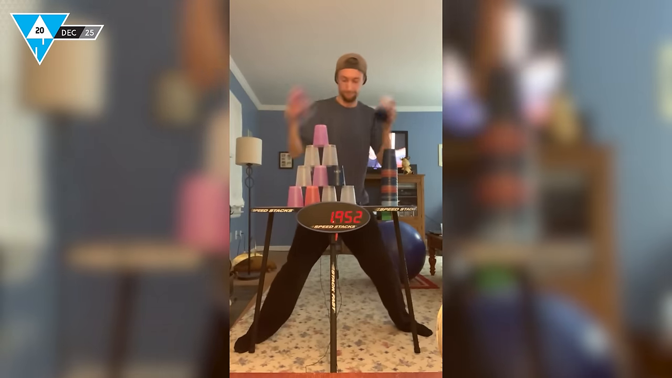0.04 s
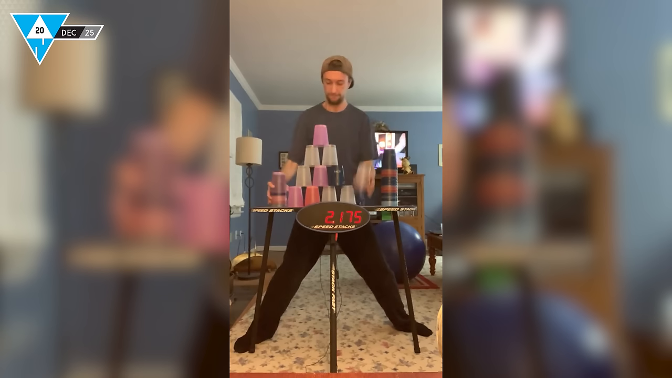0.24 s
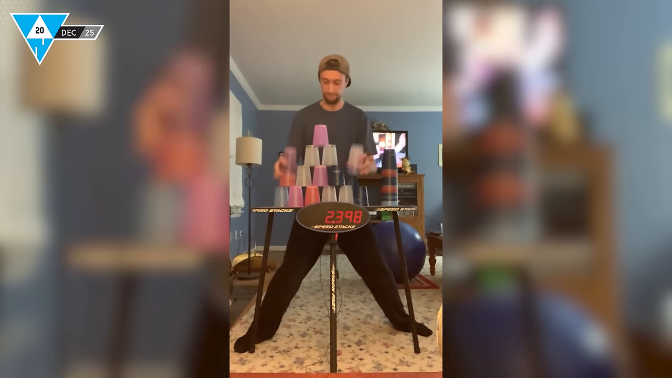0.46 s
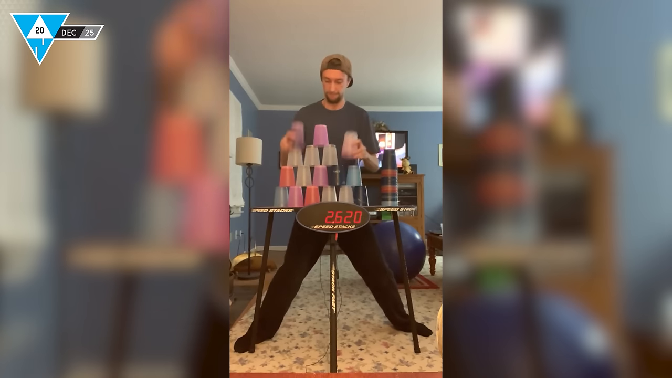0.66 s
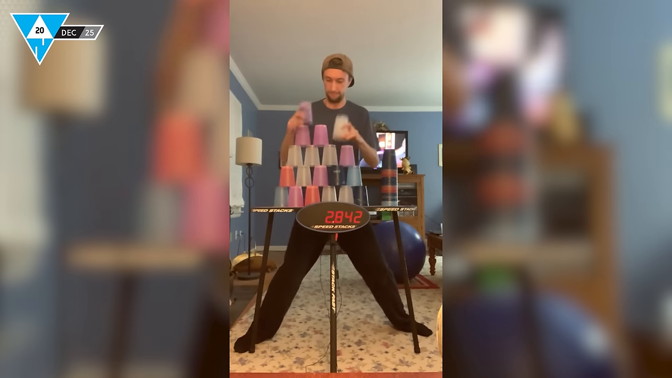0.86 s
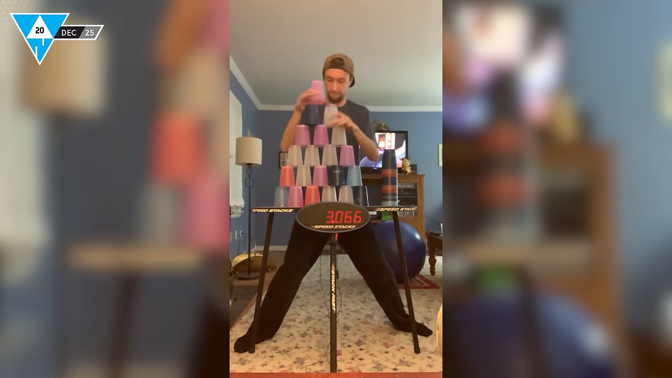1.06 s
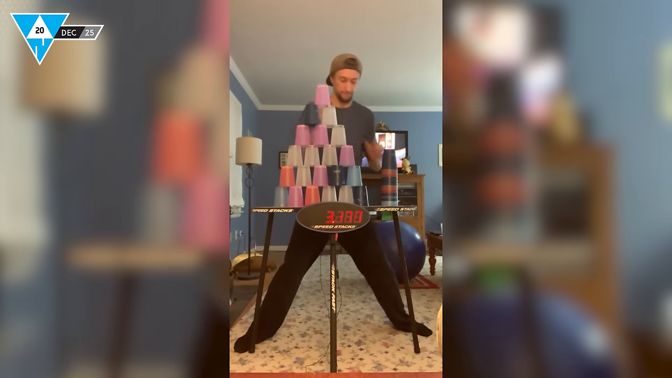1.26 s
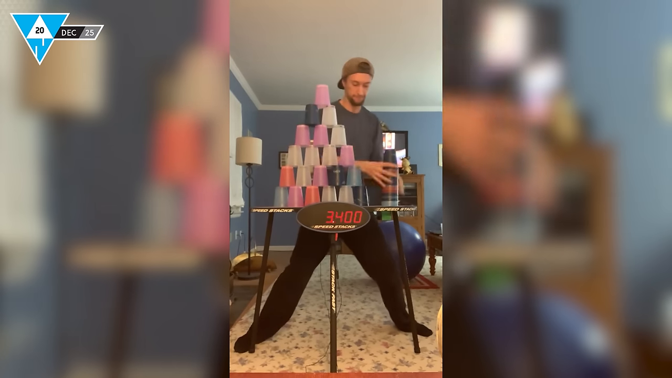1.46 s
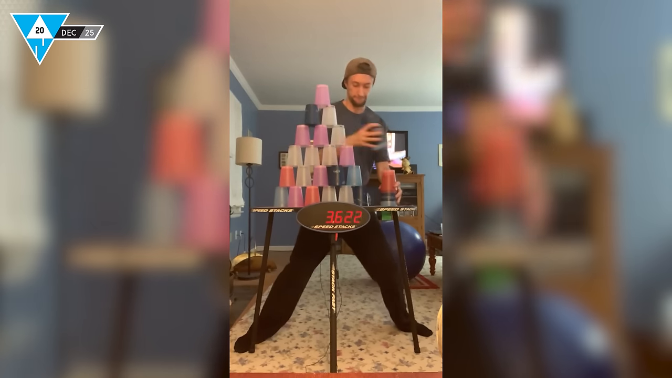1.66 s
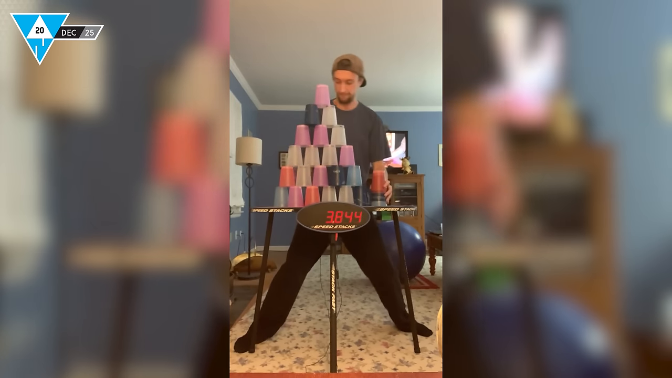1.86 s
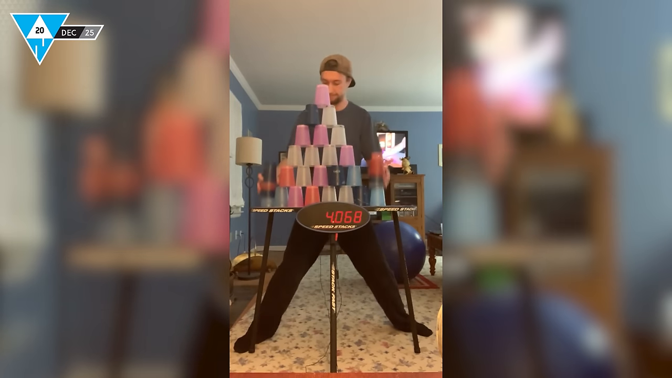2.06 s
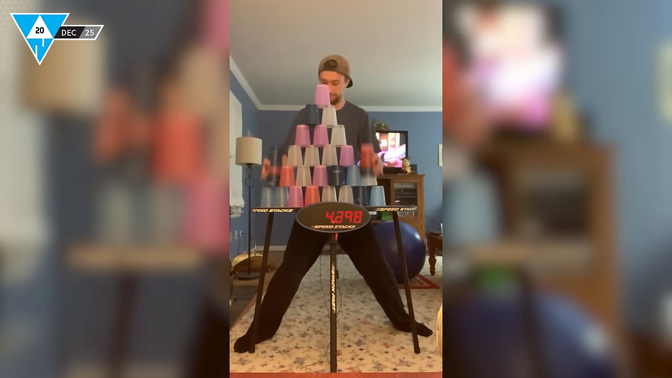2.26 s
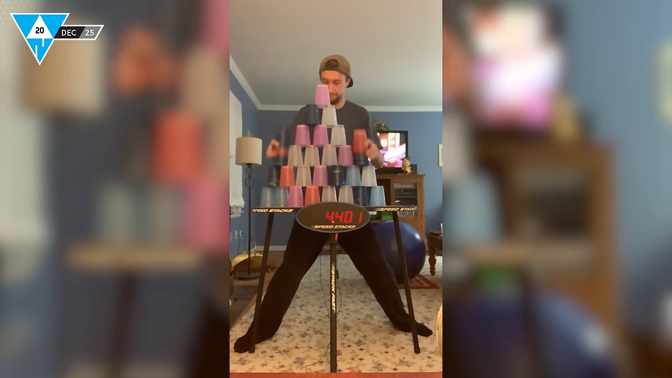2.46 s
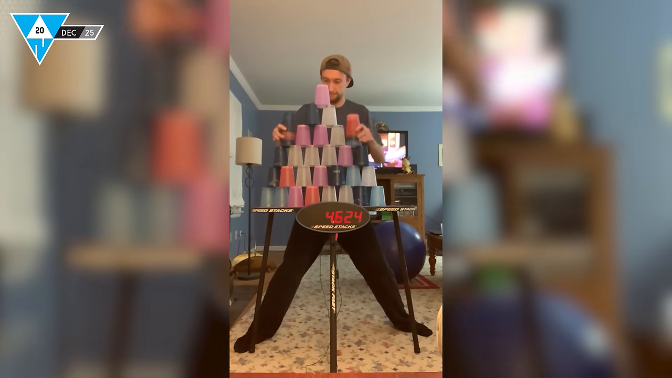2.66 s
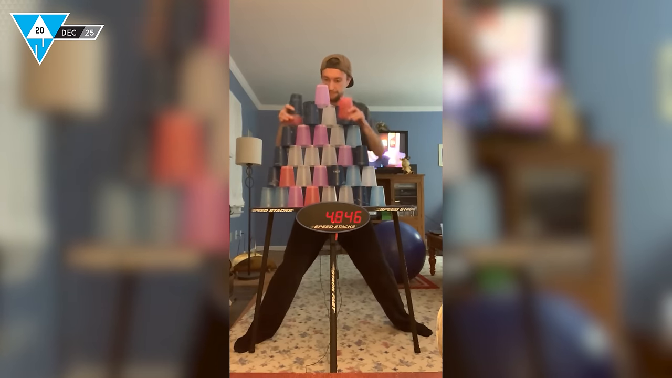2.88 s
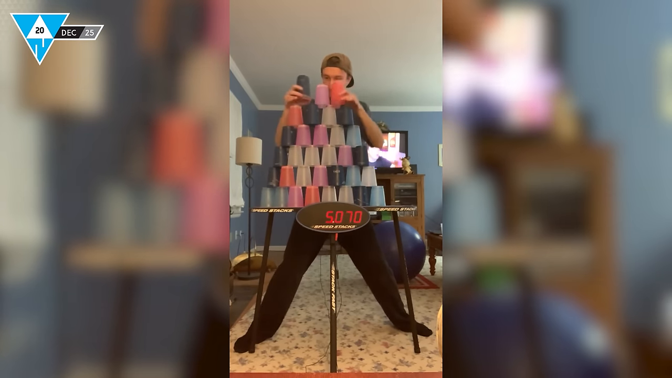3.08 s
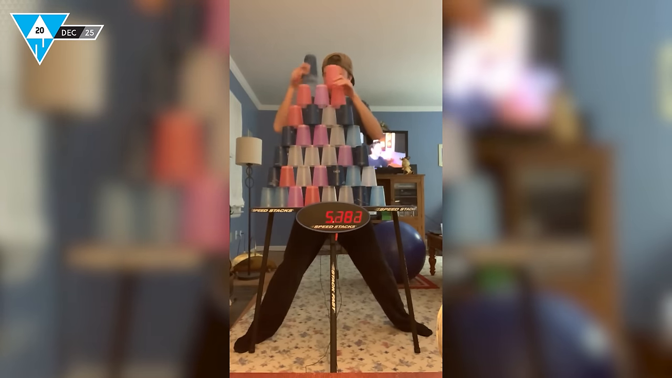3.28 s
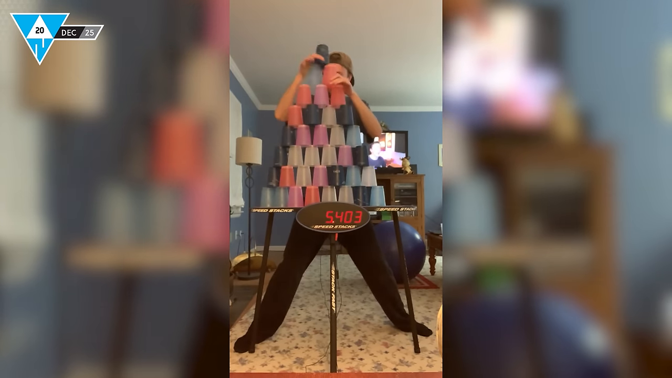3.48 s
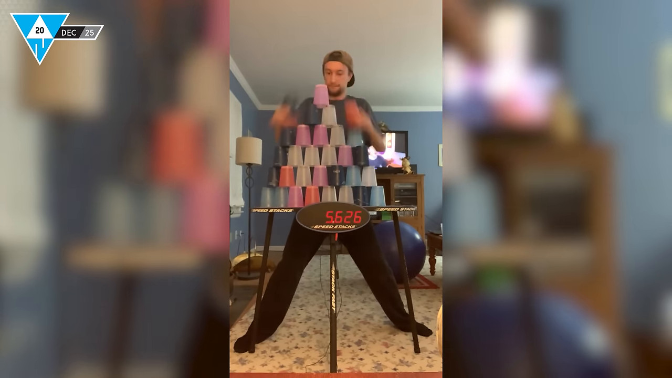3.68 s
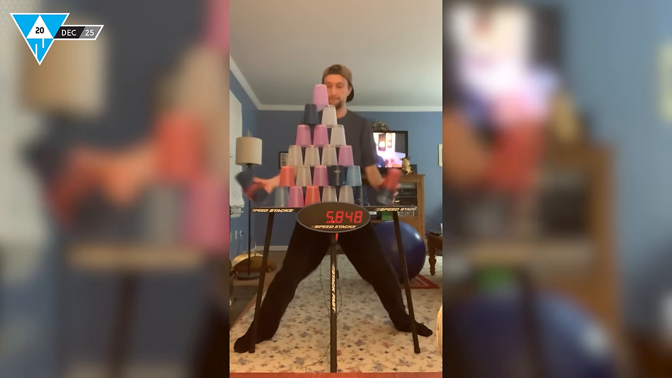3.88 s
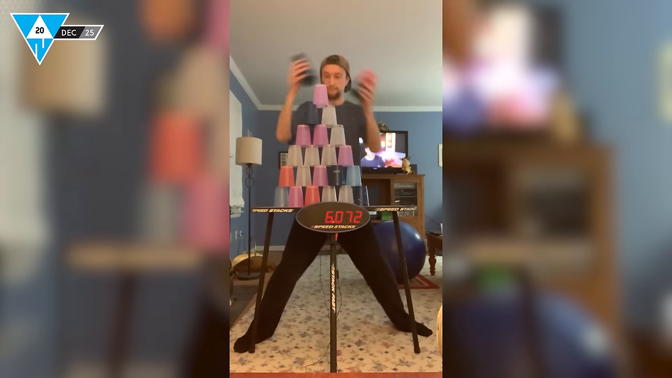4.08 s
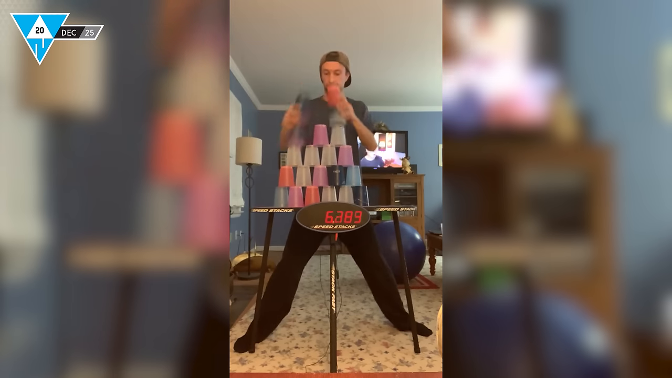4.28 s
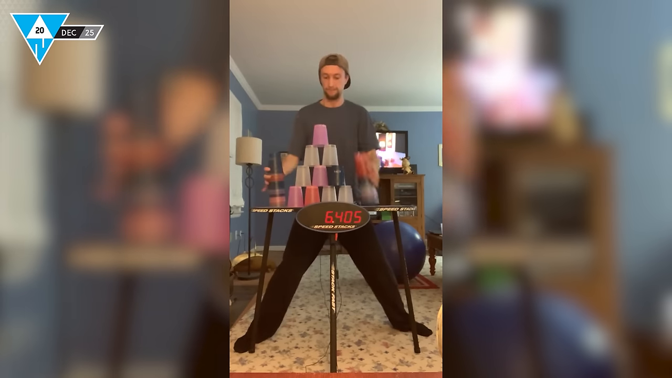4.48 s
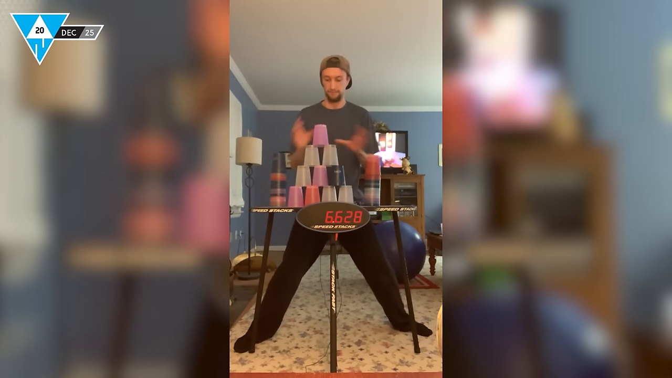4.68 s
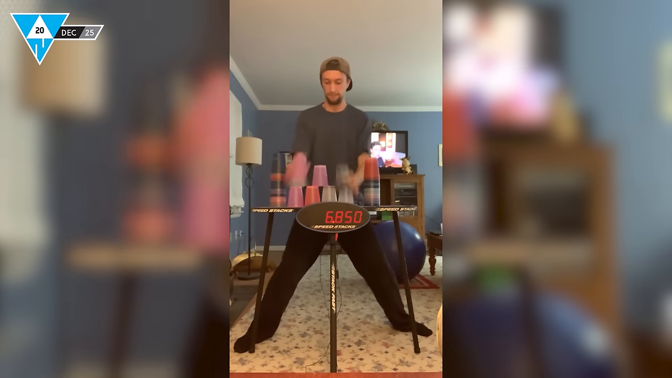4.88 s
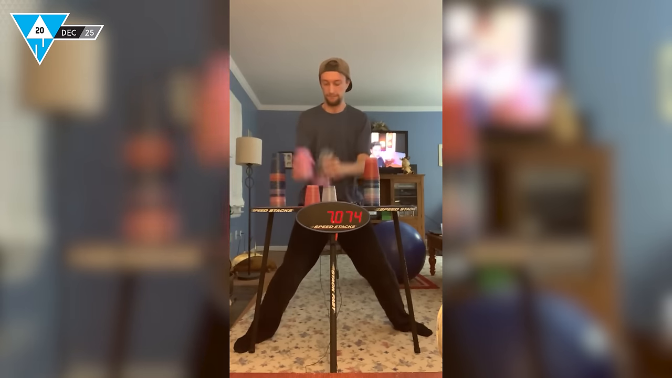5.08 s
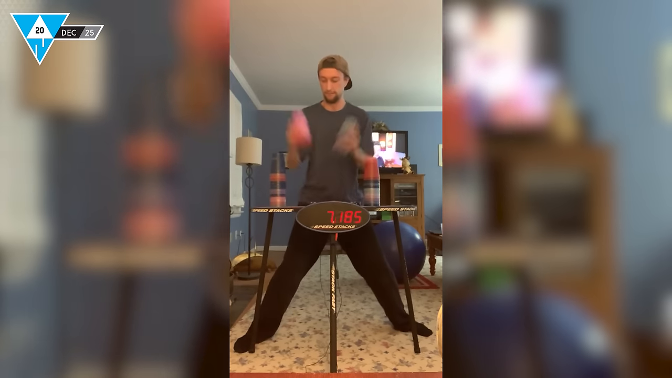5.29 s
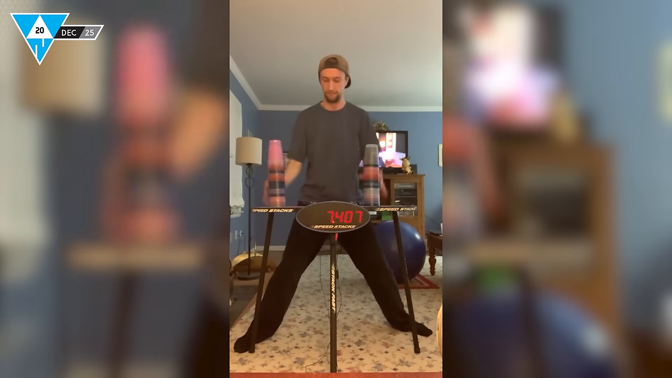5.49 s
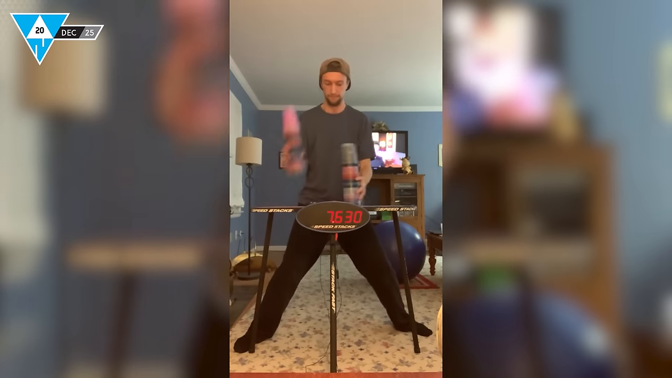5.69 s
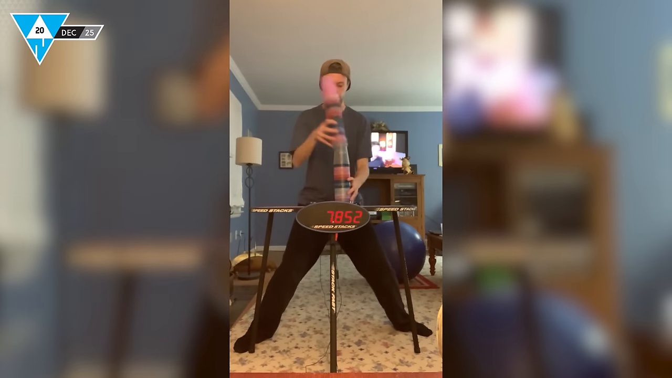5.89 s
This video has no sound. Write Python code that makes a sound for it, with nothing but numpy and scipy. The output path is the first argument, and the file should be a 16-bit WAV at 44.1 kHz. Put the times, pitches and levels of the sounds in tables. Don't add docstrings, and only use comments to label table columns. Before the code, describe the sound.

In a small living room, light hollow plastic cups are set down one by one in a very fast run, pause briefly, then a second fast run follows. After that the cups slam and slide together in dense clattering, scraping bursts with dull table thumps, and end on a few soft taps. A phone listens in stereo from across the room, with short room reverberation and faint air noise.

```python
import sys
import numpy as np
from scipy import signal
from scipy.fft import rfft, irfft, next_fast_len
from scipy.io import wavfile
from scipy.ndimage import uniform_filter1d

SR = 44100
rng = np.random.default_rng(int(sys.argv[2]) if len(sys.argv) > 2 else 0)


def attenuation_scalar(level_db):
    decades = np.asarray(level_db, float) / 20
    return 10 ** decades


def store_pcm(level_fs):
    pcm = np.round(np.clip(level_fs, -1, 1) * 32767).astype(np.int16)
    wavfile.write(sys.argv[1], SR, np.atleast_2d(pcm).T)


N = 261954
LEAD = 500
SHELL = signal.butter(3, 430, "high", fs=SR, output="sos")

# (frequency [Hz], level [dB], t60 [s])
WALL_MODES = [(520, 2, 0.011), (540, 1.5, 0.008), (620, -6, 0.0035), (793, 0.5, 0.061), (917, -5, 0.16),
              (1190, -6, 0.018), (1270, -11, 0.085), (1350, 1, 0.016), (1694, -10, 0.075),
              (2000, -10, 0.0082), (2790, -31, 0.06), (3350, -22.5, 0.056), (4277, -18, 0.06)]
# (frequency [Hz], density [dB per Hz])
RIM_NOISE = [(820, -13.5), (1400, -10.5), (1510, 1), (3350, -6), (3720, -10.5), (4440, -9), (4980, -15),
             (7390, -12.5), (9390, -10), (11600, -19), (14400, -14), (16100, -23), (16800, -99.5)]
# (time [s], thump [dB], sway [dB])
TABLE_BANGS = [(2.098, -49, -60), (3.719, -54, -57.5), (3.838, -33, -44.5), (4.259, -33, -39),
               (4.333, -27, -39), (4.472, -34, -38), (4.538, -36.5, -61), (4.982, -38, -46.5),
               (5.108, -31, -52.5), (5.189, -30, -44), (5.474, -28.5, -37), (5.917, -58.5, -50.5)]


def evened(x):
    return x / np.sqrt(np.mean(x ** 2) + 1e-20)


def peaked(x):
    return x / np.sqrt(uniform_filter1d(x ** 2, 220).max())


def read(points, hz):
    f, value = np.transpose(points)
    return np.interp(np.log(hz + 1), np.log(f + 1), value)


def coloured(x, points):
    length = x.shape[-1]
    size = next_fast_len(length, True)
    gain = attenuation_scalar(read(points, np.fft.rfftfreq(size, 1 / SR)))
    return irfft(rfft(x, size) * gain, size)[..., :length]


def add(mix, s, sound):
    part = mix[round(s * SR):][:len(sound)]
    part += sound[:len(part)]


def ring(modes, size, detune, luck_db):
    hz, db, t60 = np.transpose(modes)[:, :, None]
    off, sign, luck = rng.standard_normal((3, len(modes), 1))
    t = np.arange(size) / SR
    level = np.sign(sign) * attenuation_scalar(db + luck_db * luck - 60 * t / t60)
    return (level * np.sin(2 * np.pi * hz * (1 + detune * off) * t)).sum(0)


def knocks():
    # (time [s], blow [dB], cup air
    # [Hz], rim [Hz])
    set_down = [(0.287, -15.5, 600, 1940), (0.478, -17.5, 713, 1820), (0.484, -18.5, 630, 4100),
                (0.552, -31, 650, 1925), (0.578, -6, 757, 1870), (0.649, -17.5, 1260, 1905),
                (0.69, -32, 560, 2214), (0.716, -26.5, 650, 2830), (0.772, -7.5, 807, 1900),
                (0.863, -21, 880, 3370), (0.903, -24, 643, 2100), (0.936, -31.5, 554, 3600),
                (0.969, -9.5, 914, 3650), (1.02, -14, 1240, 2070), (1.123, -17, 1270, 2720),
                (1.13, -20, 1250, 2940), (1.161, -12, 1260, 5600), (1.165, -9.5, 810, 6370),
                (2.1, -33, 563, 1750), (2.122, -30, 700, 4480), (2.29, -16, 640, 1770),
                   (2.303, -14.5, 560, 4040), (2.339, -19.5, 730, 2000), (2.405, -32, 666, 2000),
                   (2.499, -6.5, 580, 2600), (2.545, -20.5, 620, 3600), (2.62, -37, 556, 3430),
                   (2.705, -15, 1188, 4200), (2.722, -13, 820, 1950), (2.906, -14, 1253, 1930),
                   (2.954, -12, 1350, 2790), (3.11, -12, 890, 2000), (3.143, -28, 710, 1960),
                   (3.172, -13.5, 872, 6200), (3.307, -19.5, 950, 1850), (3.377, -18.5, 936, 1950),
                   (3.409, -19, 876, 2010), (3.441, -25.5, 609, 2020), (3.517, -8.5, 1239, 1930),
                   (3.543, -15, 1270, 2120)]
    # (time [s], blow [dB], cup air [Hz], rim [Hz], crack over the blow [dB])
    rim_first = [
        (0.293, -22.5, 1400, 3050, -3.5),
        (0.309, -23.5, 2616, 2900, -8.5),
        (0.323, -30, 1400, 2800, -0.5),
        (2.098, -27, 594, 2800, -13.5),
        (2.311, -26, 1366, 4300, -4.5),
        (3.673, -18.5, 980, 6720, 6),
        (3.845, -29, 718, 3410, 5.5),
    ]
    # (time [s], blow [dB], cup
    # air [Hz], rim [Hz], crack over the blow [dB])
    row_slams = [(3.632, -30.5, 920, 6000, -15), (3.682, -8.5, 988, 3350, -12.5),
                 (3.705, -16, 1322, 3370, 5), (3.735, -15.5, 1000, 5600, 0), (3.762, -18, 854, 1910, 4.5),
                 (3.817, -16.5, 903, 2400, 2.5), (3.691, -6, 904, 3350, -9.5), (3.722, -16, 1190, 2360, 4),
                 (3.743, -13, 1253, 1900, -14.5), (3.788, -6, 1265, 2060, -11),
                 (3.795, -13, 950, 4400, -0.5), (3.801, -22.5, 514, 5500, 9.5),
                 (3.824, -6, 618, 1970, -6.5), (3.867, -18.5, 565, 2400, 2.5),
                 (4.249, -10.5, 908, 6300, -14), (4.297, -15, 1270, 3350, 1.5),
                 (4.304, -22, 1440, 6300, -1), (4.33, -6.5, 1274, 2880, -9), (4.348, -25, 598, 2900, -8.5),
                 (4.366, -15, 812, 3170, -8), (4.382, -13.5, 1294, 2700, -5),
                 (4.404, -21.5, 625, 2500, -12.5), (4.426, -19.5, 1500, 4300, 3.5),
                 (4.419, -15.5, 632, 4160, -3), (4.44, -18.5, 802, 2050, 1.5), (4.467, -15, 1180, 2100, -1),
                 (4.471, -7, 485, 3150, -6.5), (4.497, -22, 492, 2500, -10), (4.533, -21, 1130, 1700, 2),
                 (4.54, -17, 534, 2530, 4),
                 (4.786, -38, 485, 2870, 4.5), (4.829, -34.5, 1290, 6500, -28.5),
                  (4.861, -25, 1245, 3270, -3.5), (4.845, -19.5, 1292, 3500, -29.5),
                  (4.886, -7, 1280, 4070, -13), (4.911, -7, 974, 1720, -1), (4.918, -17, 1270, 2670, 6.5),
                  (4.99, -25, 683, 2350, 6.5), (4.958, -13, 544, 1870, -6.5),
                  (4.984, -22.5, 930, 2320, 3.5), (5.087, -36.5, 970, 4170, -3),
                  (5.108, -11, 785, 2230, -4.5), (5.142, -5.5, 861, 1720, -6), (5.148, -20, 780, 4500, 1.5),
                  (5.157, -2.5, 520, 3220, -21), (5.196, -17, 560, 4600, -4), (5.189, -11, 588, 2480, 1),
                  (5.327, -34.5, 570, 1860, -12), (5.442, -39.5, 730, 2640, 4),
                  (5.467, -10.5, 1203, 3450, -4.5), (5.473, -8, 1270, 2600, -1.5)]
    # (time [s], blow [dB], cup air [Hz], rim [Hz])
    nudges = [
        (1.517, -48, 456, 2570),
        (1.562, -46, 1036, 1840),
        (1.666, -42, 1420, 2500),
        (1.747, -57.5, 494, 3030),
        (1.987, -58, 1240, 2150),
        (4.122, -55, 509, 3460),
        (4.199, -40.5, 677, 6140),
        (4.731, -58, 487, 2070),
        (5.693, -45, 690, 2160),
        (5.916, -41, 1140, 3530),
    ]
    firm_crack_db, firm_db, graze = -13, -13, 0.1
    set_thump_db, slam_thump_db = -25, -30.5
    nudge_crack_db, nudge_thump_db = -9.5, -4.5
    placed = [(s, db, air, firm_crack_db + graze * (firm_db - db), set_thump_db, rim)
              for s, db, air, rim in set_down]
    slammed = [(s, db, air, crack_db, slam_thump_db, rim)
               for s, db, air, rim, crack_db in rim_first + row_slams]
    nudged = [(s, db, air, nudge_crack_db, nudge_thump_db, rim) for s, db, air, rim in nudges]
    return placed + slammed + nudged


def cup_body(contacts, air_hz):
    near_db = 5
    grip_t60, air_t60 = 0.02, 0.016
    wall = [(hz, db - near_db * abs(np.log2(hz / air_hz)), min(t60, grip_t60)) for hz, db, t60 in WALL_MODES]
    modes = wall + wall + [(air_hz, 7, air_t60)]
    body = signal.fftconvolve(ring(modes, size=1500, detune=0.02, luck_db=0.86), contacts)[:1500]
    return peaked(signal.sosfilt(SHELL, signal.sosfilt(SHELL, body)))


def rim_crack(contacts, rim_hz):
    # (frequency [Hz], level [dB])
    hiss_dull = [(3000, 6), (7000, -0.5), (9000, -22.5)]
    crack_t60 = 0.1
    t = np.arange(1500) / SR
    near_rim = [(rim_hz / 1.38, 0), (rim_hz, 6.), (rim_hz * 1.1, 0)]
    noise = coloured(coloured(rng.standard_normal(LEAD + 1500), RIM_NOISE), near_rim)
    snaps = signal.fftconvolve(contacts ** 2, np.exp(-t / 0.00098))[:1500]
    swell = attenuation_scalar(-60 * t / crack_t60) * (1 - np.exp(-t / .003))
    crack = peaked(noise[LEAD:] * (swell + 1.2 * snaps / snaps.max()))
    rim = signal.fftconvolve(ring([(rim_hz, 0, .007)] * 3, size=500, detune=.04, luck_db=0), contacts)
    add(crack, 0, 0.53 * peaked(rim))
    rise_db = -22 * t[LEAD:0:-1] / t[LEAD]
    return attenuation_scalar(rise_db) * coloured(evened(noise[:LEAD]), hiss_dull), crack


def chatter(air_hz):
    # (frequency [Hz], density [dB per Hz])
    shiver_noise = [(380, -31), (520, 6), (620, 8), (830, -3), (1050, -7.5), (1280, -3), (1600, -10.5),
                    (4000, -28.5), (7000, -32.5)]
    level_db, t60, near_db = -13.5, 0.24, 3
    t = np.arange(4000) / SR
    near_air = [(hz, db - near_db * abs(np.log2(hz / air_hz))) for hz, db in shiver_noise]
    shiver = evened(coloured(rng.standard_normal(4000), near_air))
    flutter_db = 3.7 * evened(uniform_filter1d(rng.standard_normal(4000), size=200))
    return attenuation_scalar(level_db - 60 * t / t60) * (1 - np.exp(-t / 0.0082)) * shiver * attenuation_scalar(flutter_db)


def thump():
    # (frequency [Hz], level [dB], t60 [s])
    top_modes = [(135, 3, 0.12), (166, 5, 0.16), (215.6, -4, 0.21), (280.6, 7, 0.1), (400, -5, 0.27),
                 (420.6, 7.5, 0.12)]
    swell = 1 - np.exp(-np.arange(4000) / SR / 0.011)
    return peaked(ring(top_modes + top_modes, size=4000, detune=0.0746, luck_db=0.5) * swell)


def knock(db, air_hz, crack_db, thump_db, rim_hz):
    t = np.arange(500) / SR
    landing = t / 0.0054 * np.exp(-t / 0.0028)
    contacts = rng.standard_normal(500) * (rng.random(500) < .04) * landing
    contacts[30] += .4
    hiss, crack = rim_crack(contacts, rim_hz)
    sound = np.r_[attenuation_scalar(crack_db - 11) * hiss, attenuation_scalar(thump_db - 2.5) * thump()]
    add(sound, LEAD / SR, cup_body(contacts, air_hz) + attenuation_scalar(crack_db - 2.0) * crack)
    add(sound, LEAD / SR, chatter(air_hz))
    return attenuation_scalar(db - 5.5) * sound


def slide(s, run_up, hold, db, bright_db):
    run_up_db, fade_db, fade_s = -24.5, -36.5, 0.046
    times = np.maximum.accumulate([max(s - run_up, 0), s, s + hold, s + hold + fade_s])
    return [(at, db + off_db, bright_db) for at, off_db in zip(times, (run_up_db, 0, 0, fade_db))]


def rattle(rows, under_db, per_s, spread_db, hiss):
    s, db, bright_db = np.transpose(rows)
    t = np.arange(s[0], s[-1], 1 / SR)
    strength = attenuation_scalar(spread_db * np.minimum(rng.exponential(1, len(t)), 4))
    contacts = strength * (rng.random(len(t)) < per_s / SR)
    which = rng.integers(0, 3, len(t))
    body = np.zeros(len(t))
    for k in range(3):
        wall = ring(WALL_MODES, size=1500, detune=0.056, luck_db=-1.0)
        body += signal.fftconvolve(contacts * (which == k), wall)[:len(t)]
    body = signal.sosfilt(SHELL, body)
    puffs = signal.fftconvolve(contacts, np.exp(-np.arange(600) / 24.0))[:len(t)]
    scrape = coloured((hiss + evened(puffs)) * rng.standard_normal(len(t)), RIM_NOISE)
    sound = evened(body) + attenuation_scalar(np.interp(t, s, bright_db)) * evened(scrape)
    return s[0], attenuation_scalar(np.interp(t, s, db) - under_db) * sound * signal.windows.tukey(len(t), .05)


def cups():
    # (time at full speed [s], run-up [s], hold [s], rattle [dB], scrape over the rattle [dB])
    sweeps = [
        (3.634, 0.033, 0.038, -27.5, 1),
        (3.676, .015, 0.13, -27.5, 3.5),
        (4.196, .008, 0.11, -44, -0.5),
        (4.249, .008, 0.25, -29, 4.5),
        (4.854, 0.072, 0.049, -30, -3.5),
        (4.901, 0.022, 0.093, -31.5, 7.5),
        (5.112, 0.0034, 0.027, -35, 7.5),
        (5.473, 0.02, 0.0035, -38, 0),
    ]
    # (time at full speed [s], run-up [s], hold [s], rustle [dB], brightness [dB])
    hands = [
        (.002, 0.003, 0.0041, -41, -7.5),
        (0.384, 0.049, 0.061, -53.5, 11.5),
        (1.524, 0.041, 0.1, -53, -4.5),
        (1.666, 0.026, 0.0044, -43, -30),
        (1.783, 0.034, 0.04, -75.5, 12),
        (1.915, .03, 0.0239, -62.5, -1),
        (2.379, 0.012, 0.27, -38.5, -9),
        (5.611, 0.026, 0.22, -58.5, 2.5),
        (5.92, 0.016, 0.017, -38, 0.5),
    ]
    mix = np.zeros(N)
    for s, *blow in knocks():
        add(mix, s - .001 - LEAD / SR, knock(*blow))
    for s, thump_db, _ in TABLE_BANGS:
        add(mix, s, attenuation_scalar(thump_db) * thump())
    for row in sweeps:
        add(mix, *rattle(slide(*row), under_db=6.5, per_s=500., spread_db=2.0, hiss=0.08))
    for row in hands:
        add(mix, *rattle(slide(*row), under_db=10.0, per_s=6300.0, spread_db=4.0, hiss=1.7))
    return signal.sosfilt(signal.butter(3, 110, "high", fs=SR, output="sos"), mix)


def table():
    rest_db, under_blow_db, rise_s, t60 = -73.5, -49, 0.0024, 0.66
    pushes = [(s, db + under_blow_db) for s, db, *_ in knocks()] + [(s, db) for s, _, db in TABLE_BANGS]
    push = np.zeros(N)
    for s, db in pushes:
        push[round(s * SR)] += attenuation_scalar(2 * db)
    t = np.arange(SR) / SR
    power = signal.fftconvolve(push, (1 - np.exp(-t / rise_s)) ** 2 * attenuation_scalar(-120 * t / t60))[:N]
    sway = [(15, -25.5), (30, -12.5), (52, -1.5), (75, -1), (110, -8.0), (200, -61.5)]  # (Hz, dB)
    lumps = coloured(rng.standard_normal(N), sway)
    return np.sqrt(abs(power) + attenuation_scalar(2 * rest_db)) * evened(lumps)


def hums():
    # (time [s], length [s], frequency [Hz], level [dB])
    tones = [
        (0.086, 0.12, 2110, -81),
        (1.293, 0.19, 374, -75),
        (1.828, 0.15, 2090, -77.5),
        (2.001, 0.28, 427, -68),
        (4.09, 0.11, 507, -64.5),
        (5.681, 0.31, 1290, -76),
        (5.682, 0.13, 2130, -72),
        (5.82, 0.12, 508, -65),
        (5.915, 0.019, 3490, -53.5),
    ]
    mix = np.zeros(N)
    for s, length, hz, db in tones:
        t = np.arange(0, length, 1 / SR)
        waver = np.cumsum(uniform_filter1d(rng.standard_normal(len(t)), 300)) * 0.039
        add(mix, s, attenuation_scalar(db + 8.0) * np.sin(2 * np.pi * hz * t + waver) * np.hanning(len(t)))
    return mix


def room(x):
    # (frequency [Hz], t60 [s])
    decay = [(100, 0.53), (260, 0.51), (700, 0.27), (1840, 0.32), (4850, 0.26), (12000, 0.21)]
    # (frequency [Hz], level [dB])
    late_dull = [(1500, -2.5), (4000, -3.5)]
    late_db, late_stretch = -24, 3.1
    taps = np.zeros(SR * 3 // 4)
    at = np.arange(260, len(taps) - 20, 20)
    taps[at + rng.integers(0, 20, len(at))] = rng.choice([-1., 1.], len(at))
    hz, t, z = signal.stft(taps, SR, nperseg=256)
    fall_db = -60 * t / read(decay, hz)[:, None]
    late = attenuation_scalar(late_db + read(late_dull, hz)[:, None] + fall_db / late_stretch)
    tail = signal.istft(z * (attenuation_scalar(fall_db) + late), SR, nperseg=256)[1]
    return signal.fftconvolve(x, tail / np.linalg.norm(tail))[:N]


def view():
    # (frequency [Hz], level [dB])
    stack = [(250, -2), (450, 0), (590, 0), (800, -4), (1000, 1.5), (1270, 3), (1550, -1.5), (2700, -2),
             (4300, 1.5), (9000, 1)]
    # (frequency [Hz], level [dB])
    air_noise = [(15, -25.5), (25, 1.5), (64, 1.5), (1500, -27), (2100, -11), (2690, -24), (6530, -29),
                 (9000, -34.5), (11700, -35), (12300, -70.5), (19800, -120)]
    room_db, air_db = -7, -72.5
    turns_per_s = 2.9
    dry = cups()
    sent = coloured(dry, stack)
    place = 2 * np.pi * turns_per_s * np.arange(N) / SR
    tails = room(sent * np.sin(place)) + room(sent * np.cos(place))
    air = attenuation_scalar(air_db) * evened(coloured(rng.standard_normal(N), air_noise))
    return dry + attenuation_scalar(room_db) * tails + hums() + table() + air


def scene():
    # (frequency [Hz], likeness [0..1])
    likeness = [(30, 1), (100, 0.71), (330, 0.86), (700, 0.34), (2000, 0.91), (5000, 0.14), (8000, 0.82),
                (10500, 0.86), (12200, 0.98), (16000, 0.92)]
    # (frequency [Hz], phase [rad])
    left_lead = [(430, 0), (700, -1.3), (1800, -1.7), (2740, -1.6), (5000, -1.7), (7000, -2.2),
                 (8300, -3.1), (10000, -3.), (11000, -1.2), (12200, 0), (16500, 0)]
    size = next_fast_len(N, True)
    hz = np.fft.rfftfreq(size, 1 / SR)
    same = np.clip(read(likeness, hz), 0, 1)
    half_turn = np.exp(.5j * read(left_lead, hz))
    shared = np.sqrt((1 + same) / 2) * rfft(view(), size)
    own = np.sqrt((1 - same) / 2) * rfft(view(), size)
    return irfft(np.array([(shared + own) * half_turn, (shared - own) / half_turn]), size)[:, :N]


def gated(x):
    gate_db, depth_db, from_hz = -100., -8.5, 1500
    hz, t, z = signal.stft(x, SR, nperseg=1024)
    power = uniform_filter1d((abs(z) ** 2).mean(0), size=5, axis=0)
    level_db = 10 * np.log10(abs(power) + 1e-20)
    shut = np.clip((gate_db - level_db) / 6. + .5, 0, 1) * (hz > from_hz)[:, None]
    return signal.istft(z * attenuation_scalar(depth_db * shut), SR, nperseg=1024)[1][:, :N]


def thinned(heard):
    # (low band from [Hz], low band to [Hz], everything above [Hz])
    weak_hz = (8300, 10100, 15700)
    patch_share, patch_below_db = 0.15, -50.5
    hz, t, centre = signal.stft(heard.mean(0), SR, nperseg=1024)
    band = (hz > weak_hz[0]) & (hz < weak_hz[1]) | (hz > weak_hz[2])
    power = (abs(centre[hz > 2000]) ** 2).sum(0)
    steady = power < 4 * np.r_[power[:2], power[:-2]]
    luck = rng.random((len(t) // 4 + 1, len(hz) // 16 + 1))
    luck = np.kron(luck, np.ones((4, 16)))[:len(t), :len(hz)].T
    soft = np.clip((patch_below_db - 10 * np.log10(power + 1e-20)) / 24.0 + .5, 0, 1)
    skipped = band[:, None] | ((hz > 7500)[:, None] & (luck < patch_share * soft))
    return heard - signal.istft(centre * skipped * steady, SR, nperseg=1024)[1][:N]


def top_cut(x):
    return signal.sosfilt(signal.butter(12, 16990, fs=SR, output="sos"), x)


def record(dry):
    # (frequency [Hz], level [dB])
    mic_colour = [(30, 2.5), (200, 1), (600, 0.84), (2000, -1), (6000, 8), (7800, 5), (9000, 0), (10500, 4),
                  (13000, 0.9), (16300, -5.5), (17100, -45)]
    heard = coloured(0.91 * np.tanh(dry / 1.036), mic_colour)
    return top_cut(gated(thinned(heard)))


dry = scene()
out = record(dry)
store_pcm(out)
```